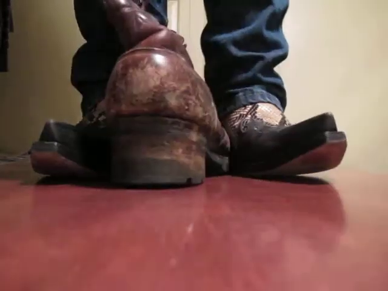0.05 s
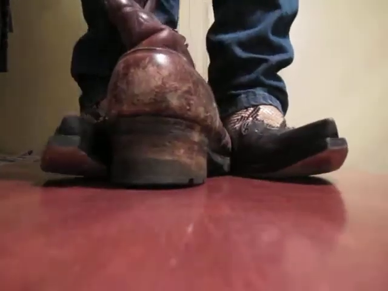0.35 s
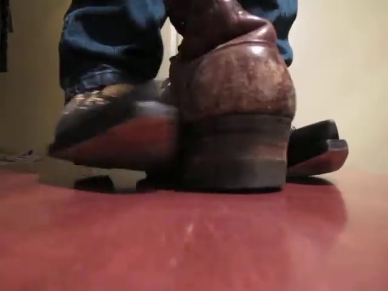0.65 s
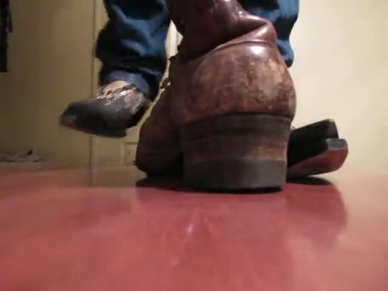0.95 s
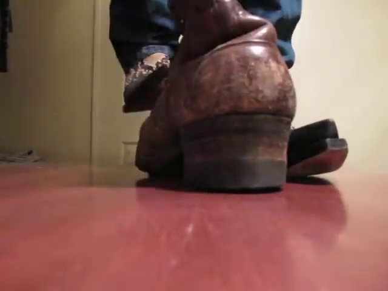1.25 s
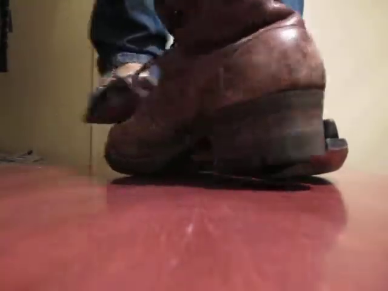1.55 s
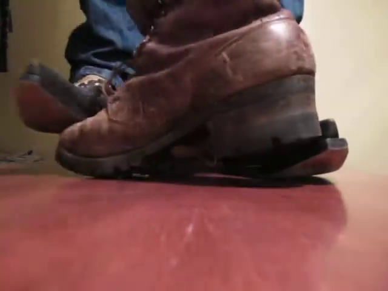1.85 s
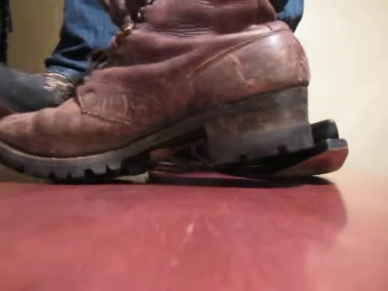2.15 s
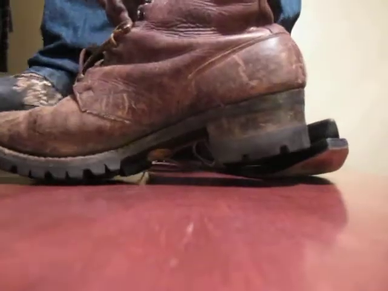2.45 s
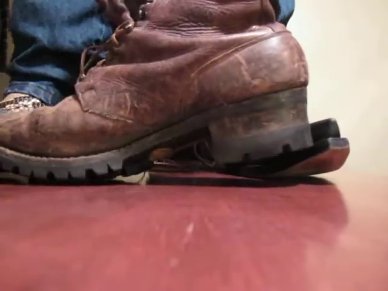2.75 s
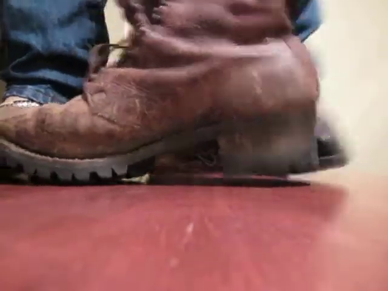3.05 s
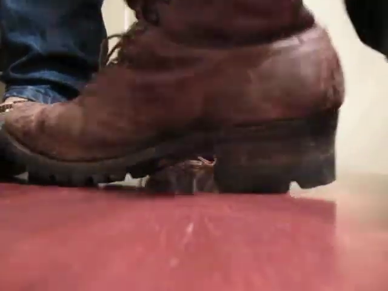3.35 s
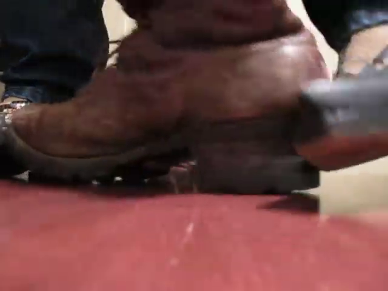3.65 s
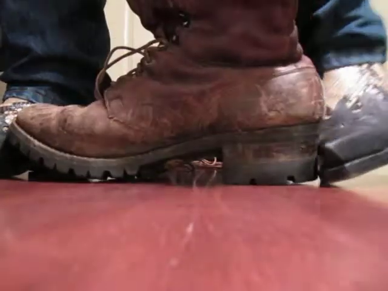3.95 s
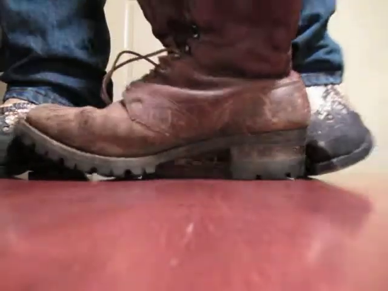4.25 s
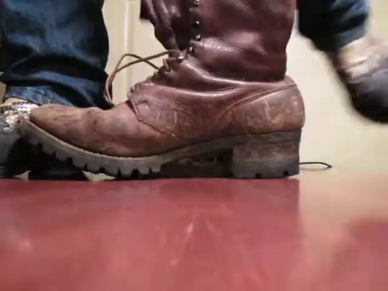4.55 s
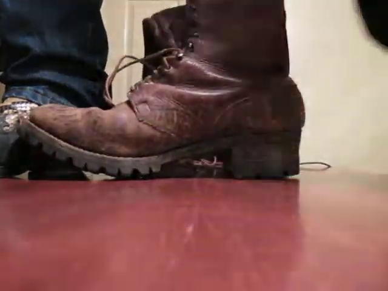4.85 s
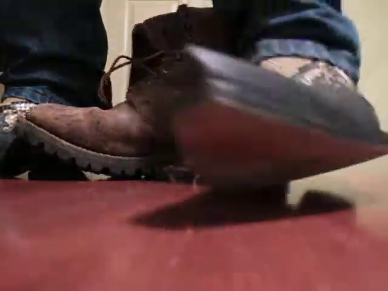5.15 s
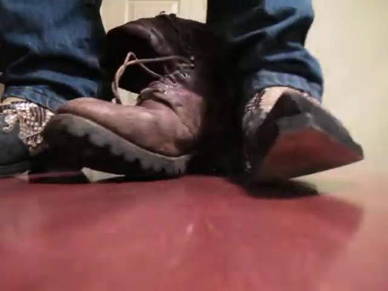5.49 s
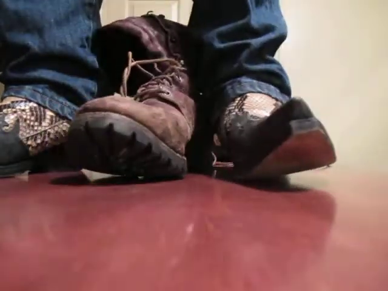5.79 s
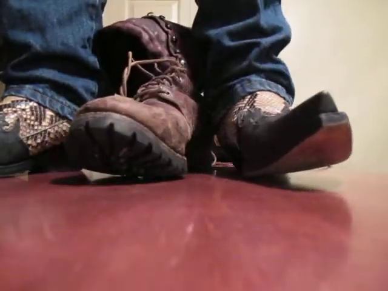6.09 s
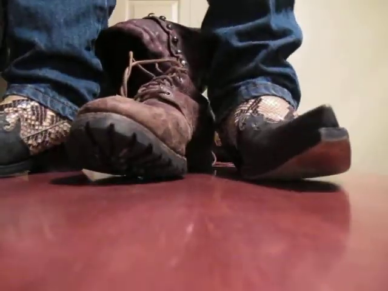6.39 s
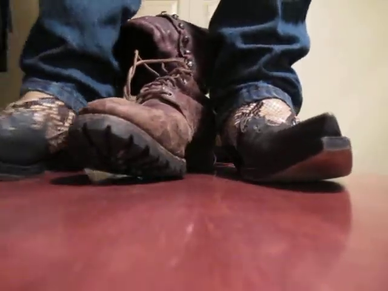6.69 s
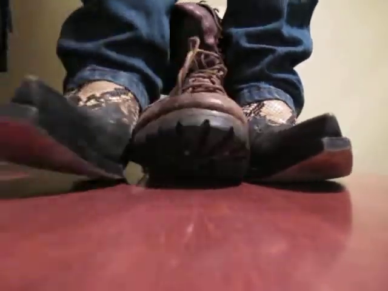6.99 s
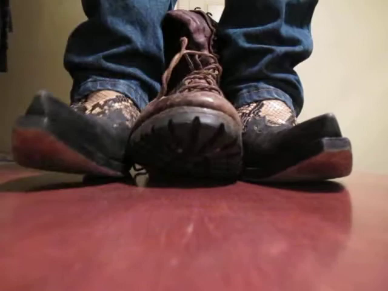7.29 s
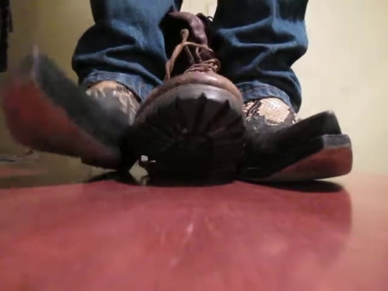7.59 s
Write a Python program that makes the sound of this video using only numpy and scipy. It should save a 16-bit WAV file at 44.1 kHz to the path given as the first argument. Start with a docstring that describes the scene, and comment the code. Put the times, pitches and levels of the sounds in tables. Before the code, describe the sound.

Boots stomp and grind against an empty leather boot on a wooden floor, with dull thuds, scuffs and small creaks.

```python
"""Heeled leather boots against an empty work boot on a wooden floor; small room, close low microphone.
Rumble and mains hum throughout. First, denim and leather rub, soles catch, leather sticks and squeaks.
From 0.35 s, stomps among light taps: each thuds in the sole, rings the boards, slaps the leather.
The hardest, at 3.07 s amid creaks, hits a limiter. From 4 s, mostly grinding, taps and soft blows.
From 6.7 s, a squeak and a last run of stomps."""
import sys
import numpy as np
from scipy import signal
from scipy.fft import rfft, irfft, next_fast_len
from scipy.io import wavfile
from scipy.ndimage import uniform_filter1d, minimum_filter1d

SR = 44100
rng = np.random.default_rng(int(sys.argv[2]) if len(sys.argv) > 2 else 0)


def put_to_file(sound):
    """Save the sound as 16-bit audio at rate SR, in the file named by the first command-line argument."""
    columns = np.atleast_2d(sound).T  # one column per channel
    safe = np.clip(columns, -1, 1)
    whole_steps = np.round(safe * 32767)
    wavfile.write(sys.argv[1], SR, whole_steps.astype(np.int16))


N = 345303
TIME_S = np.arange(N) / SR
AGE_S = np.arange(SR // 3) / SR  # since a blow
TOP_HZ = 15700

# spectra of building rumble, denim swish, sole scuff, leather slip, heel knock, leather slap:
# f/Hz, level/dB
RUMBLE_EQ = [(4, -5), (10, -2), (20, -8), (32, -24.5), (55, -25), (100, -30.5), (170, -39), (300, -45.5),
             (600, -56), (2000, -73.5)]
SWISH_EQ = [(700, -3), (2200, 3), (3700, -0.5), (5500, 1), (8000, 4.5), (9800, 3), (11000, -1.5),
            (12500, -10), (15500, -25)]
SCUFF_EQ = [(60, 1), (150, 11.5), (280, 15), (450, 8.5), (800, 4.5), (1400, 0), (1900, -4), (3000, -5),
            (6000, -9.5), (14000, -44)]
CREAK_EQ = [(300, -11), (900, 13), (1900, 8), (3200, 9), (5000, 7.5), (9000, 3), (12000, -13), (15500, -22)]
KNOCK_EQ = [(250, -15), (450, 1.5), (780, -1), (1200, -11), (1900, -11), (3000, -21), (6000, -36.5),
            (14000, -46)]
SLAP_EQ = [(700, -42.5), (1800, 3.5), (3200, 9.5), (5000, 3), (9500, 0), (12000, -14), (15500, -29)]
# boot sliding along boot: t/s, length/s, swish/dB, scuff re swish/dB, swell/dB
BOOT_SLIDES = [(0,0.019,-45.5,16,-19), (0.286,0.36,-52.5,5.5,-17), (0.583,0.034,-44,0,3),
               (1.642,.4,-54.5,-5,1), (2.055,0.17,-57.5,5,-8), (2.305,0.26,-64.5,11.5,-12),
               (2.62,0.4,-62.5,11,-8), (2.923,0.087,-41.5,-2.5,1.5), (3.234,0.3,-64.5,8.5,-13),
               (3.374,0.16,-56.5,7,10.5), (3.603,0.12,-61,5.5,12), (3.736,.11,-50,1,-9),
               (4.037,0.33,-52,0.5,-0.5), (4.7,0.19,-61.5,-16,1), (4.992,0.097,-52.5,7.5,-1),
               (5.244,.12,-60,3.5,-0.5), (5.373,0.32,-53.5,-1,-2), (6.403,0.12,-69,16,0.5),
               (6.763,0.16,-53.5,6.5,-5.5), (7.078,0.049,-44,4,5), (7.252,.17,-52,8.5,7.5),
               (7.499,0.22,-57.5,9,0.5)]
# hollows and folds of the uppers: f/Hz, width/Hz, level/dB
UPPER_RESONANCES = [(1760, 400, -15), (3760, 680, -6.5), (9370, 2200, -10)]
# drags ringing a sole or the hollow shaft: mid t/s, length/s, f/Hz, level/dB
SOLE_DRAGS = [(0.011, 0.021, 313, -40), (0.024, 0.037, 1020, -40.5), (0.483, 0.091, 2100, -54.5),
              (0.618, 0.049, 225, -41.5), (3.089, .05, 660, -26.5), (3.415, 0.0118, 594, -29),
              (4.116, 0.047, 870, -50.5), (4.27, 0.19, 1730, -59), (4.762, 0.074, 650, -52),
              (5, 0.049, 1010, -46), (5.045, 0.066, 263, -37.5), (5.342, 0.21, 1750, -56.5),
              (5.983, 0.072, 2020, -56), (6.27, .03, 585, -49), (7.39, 0.14, 597, -49)]
# leather stick-slip: t/s, length/s, first rate/Hz, last rate/Hz, peak/dB, unevenness/1
LEATHER_CREAKS = [(0.001, 0.03, 894, 1212, -24, 0.09), (0.027, 0.025, 900, 704, -25, 0.25),
                  (2.615, .016, 863, 597, -24.5, 0.32), (2.718, 0.0055, 300, 693, -27, 0.07),
                  (2.834, .025, 292, 159, -34, 0.52), (2.861, .022, 271.3, 328.5, -24.5, .2),
                  (3.25, .024, 790, 1167, -29, 0.05), (6.73, .03, 398.6, 299, -27, 0.2)]
# blows: t/s, thud peak/dB, thud f/Hz, joist boom/dB, heel knock/dB, leather slap/dB
BLOWS = [(0.349,-7,225,-23,-29.5,-55), (1.008,-21,157,-21.5,-32,-41), (1.303,-16,141,-24.5,-32.5,-38.5),
         (1.387,-26.5,237,-38,-52.5,-74), (1.52,-7,195,-17,-29.5,-34.5),
         (1.721,-22.5,190,-25.5,-42.5,-50.5), (2.149,-17.5,185,-23,-42.5,-68),
         (2.397,-26.5,180,-26.5,-52,-54), (2.657,-27,260,-26.5,-37,-47.5),
         (2.837,-26.5,254,-29.5,-44.5,-53), (3.071,4.5,259.5,-11.5,-10,-40.5),
         (3.413,-22.5,192,-23,-45,-45), (3.56,-14,186,-27.5,-43.5,-47.5), (3.762,-14,252,-21,-35.5,-59),
         (3.853,-27,229,-45,-47.5,-66), (3.943,-29,190,-33.5,-47,-50), (5.034,-20,170,-22.5,-41.5,-58),
         (5.761,-34,169,-37.5,-71,-69), (6.258,-24,255,-51,-58,-74), (6.777,-25.5,193,-32,-37.5,-50),
         (6.942,-19,163,-24.5,-37.5,-43), (7.102,-12.5,242,-29,-32.5,-53), (7.47,-24.5,166,-32,-45,-46)]
# modes of floorboards, joists, stacked heel with the panel under it: f/Hz, level/dB, t60/s
BOARD_MODES = [(155.7, -2, 0.25), (239.6, 4.5, 0.062), (247.4, -6, 0.26), (298, -13, 0.11),
               (326, -10.5, 0.14), (370, 2.5, 0.097), (489, -25, 0.17)]
JOIST_MODES = [(47.7, 1, 0.35), (57.56, 1.5, 0.39), (79.7, 0.5, 0.2), (98, 4, 0.12)]
HEEL_MODES = [(561.5, 10, 0.19), (753, 1, 0.076), (747, 1, 0.18), (840, -12, 0.13), (1105, 3, 0.027),
              (1318, 6, 0.04), (1840, -18, 0.023), (1980, -10, 0.074)]
# light contacts: t/s, knock/dB, snap/dB
LIGHT_TAPS = [(0.810,-39,-49.5), (0.956,-43,-48), (2.301,-49,-47), (2.687,-45,-55), (2.725,-45,-38),
              (3.970,-43.5,-49), (4.511,-41.5,-55), (5.393,-40.5,-48), (5.924,-45.5,-57), (5.955,-37,-44),
              (5.99,-46.5,-49.5), (6.464,-63,-51), (6.516,-37.5,-51), (6.721,-42.5,-44),
              (7.043,-40.5,-50.5), (7.246,-39,-60), (7.260,-37.5,-45.5), (7.593,-48,-51), (7.713,-52,-45),
              (7.741,-46.5,-48)]
# room decay: f/Hz, t60/s
ROOM_DECAY = [(100, 0.28), (500, 0.21), (2000, 0.17), (10000, 0.23)]


def undb(db):
    """Decibels to gain."""
    return 10 ** (np.asarray(db) / 20)


def on_log_axis(points, hz):
    """Interpolate (f/Hz, value) points over log frequency."""
    points_hz, values = np.transpose(points)
    return np.interp(np.log(np.maximum(hz, 1)), np.log(points_hz), values)


def colour(x, eq):
    """Minimum-phase filter from (f/Hz, level/dB) points."""
    size = 2 * next_fast_len(len(x))
    bins_hz = np.arange(size // 2 + 1) * SR / size
    cepstrum = irfft(np.log(undb(on_log_axis(eq, bins_hz))))
    cepstrum[1:size // 2] *= 2
    cepstrum[size // 2 + 1:] = 0
    return irfft(rfft(x, size) * np.exp(rfft(cepstrum)))[:len(x)]


def resonate(x, hz, width_hz):
    """One resonance, unity gain at centre."""
    return signal.lfilter(*signal.iirpeak(hz, hz / width_hz, fs=SR), x)


def unit(x):
    """Scale to rms 1."""
    return x / np.std(x)


def burst(x, db):
    """Set the rms level of the loudest 6 ms."""
    return x * undb(db) / np.sqrt(uniform_filter1d(x * x, 256, mode="constant").max())


def fade(t60_s):
    """Exponential decay, 60 dB in t60_s."""
    return np.exp(-np.log(1000) * AGE_S / t60_s)


def walk(rate_hz):
    """Smooth random drift, spread 1."""
    step = int(SR / rate_hz)
    stairs = np.repeat(rng.standard_normal(N // step + 1), step)
    return unit(uniform_filter1d(stairs, step)[:N])


def add(track, t_s, x):
    """Mix x in at t_s."""
    start = max(int(t_s * SR), 0)
    track[start:start + len(x)] += x[:N - start]


def background(rumble_db=-32, hum_hz=121.3, hum_db=-56):
    """Building rumble and wavering mains hum."""
    hum = np.sqrt(2) * np.sin(2 * np.pi * hum_hz * TIME_S) * undb(hum_db + walk(3.8))
    rumble = undb(rumble_db) * unit(colour(rng.standard_normal(N), RUMBLE_EQ))
    return rumble + hum


def stroke(start_s, length_s, swell_db, attack_s=0.019, release_tau_s=0.036):
    """Gain of one rub: sets in, swells or fades with pressure, dies away."""
    age_s = TIME_S - start_s
    ease_s = 0.25 * length_s * (swell_db > 0)
    attack = np.clip(age_s / (attack_s + ease_s), 0, 1)
    pressure = undb(swell_db * (np.clip(age_s / length_s, 0, 1) - 0.5))
    release = np.exp(-np.clip((age_s - length_s) / release_tau_s, 0, 20))
    return attack * pressure * release


def friction(eq, grain_db, grain_hz, judder_db):
    """Dense tiny catches of two surfaces under juddering pressure."""
    catches = rng.standard_normal(N) * undb(grain_db * walk(grain_hz) + judder_db * walk(45))
    return unit(colour(catches, eq))


def grit(rate_hz=22, peak_re_scuff_db=9.5, spread_db=4.5):
    """Sparse sharp catches of lugs and grains."""
    catches = rng.random(N) < rate_hz / SR
    strength = undb(spread_db * np.clip(rng.standard_normal(N), -2, 2))
    click_peak = np.abs(colour(signal.unit_impulse(SR), CREAK_EQ)).max()
    return undb(peak_re_scuff_db) * colour(catches * strength, CREAK_EQ) / click_peak


def rubbing(rest_swish_db=-62.5, rest_scuff_db=-57):
    """Denim and uppers swish, soles scuff lower and rougher; one stroke per slide or landing skid."""
    skid_s, skid_re_slap_db, skid_scuff_db, skid_swell_db = 0.091, -16.5, 11.5, -8.5
    skids = [(t_s, skid_s, slap_db + skid_re_slap_db, skid_scuff_db, skid_swell_db)
             for t_s, *_, slap_db in BLOWS]
    drift_db = -2.1 * walk(4)  # legs never quite still
    swish_power = undb(rest_swish_db + drift_db) ** 2
    scuff_power = undb(rest_scuff_db + drift_db) ** 2
    for t_s, length_s, swish_db, scuff_re_swish_db, swell_db in BOOT_SLIDES + skids:
        power = (undb(swish_db) * stroke(t_s, length_s, swell_db)) ** 2
        swish_power += power
        scuff_power += power * undb(scuff_re_swish_db) ** 2
    swish = friction(SWISH_EQ, grain_db=1, grain_hz=1500, judder_db=0.54)
    hollows = sum(undb(db) * resonate(swish, hz, width_hz) for hz, width_hz, db in UPPER_RESONANCES)
    scuff = friction(SCUFF_EQ, grain_db=1.5, grain_hz=492.5, judder_db=2) + grit()
    return unit(swish + hollows) * np.sqrt(swish_power) + scuff * np.sqrt(scuff_power)


def drag(length_s, hz, db, q=4):
    """Brief friction through one broad resonance."""
    swell = np.hanning(int(1.3 * length_s * SR))
    rasp = resonate(rng.standard_normal(SR), hz, hz / q)
    rasp = unit(resonate(rasp, hz, hz))
    return undb(db) * swell * rasp[:len(swell)]


def drags():
    """Soles catch on the floor and the hollow shaft."""
    out = np.zeros(N)
    for mid_s, length_s, hz, db in SOLE_DRAGS:
        rasp = drag(length_s, hz, db)
        add(out, mid_s - len(rasp) / SR / 2, rasp)
    return out


def creaks():
    """Leather stick-slip: slow uneven runs creak, fast even ones squeak."""
    out = np.zeros(N)
    for t_s, length_s, first_hz, last_hz, peak_db, uneven in LEATHER_CREAKS:
        size = int(length_s * SR)
        progress = np.linspace(0, 1, size)
        rate_hz = (first_hz + (last_hz - first_hz) * progress) * np.exp(uneven * walk(500)[:size])
        slips = np.diff(np.floor(np.cumsum(rate_hz) / SR), prepend=-1)
        scatter_db = (1.5 + 9 * uneven) * rng.standard_normal(len(AGE_S))[:size]
        force = slips * undb(scatter_db) * np.sqrt(1 - progress)
        creak = colour(np.pad(force, (0, SR // 20)), CREAK_EQ)
        add(out, t_s, creak * undb(peak_db) / np.abs(creak).max())
    return out


def ring(modes, scatter_db, detune):
    """Damped modes; foot position and load scatter level and pitch."""
    return sum(undb(db + scatter_db * rng.standard_normal()) * fade(t60_s)
               * np.sin(2 * np.pi * hz * (1 + detune * rng.standard_normal()) * AGE_S)
               for hz, db, t60_s in modes)


def contact(eq, db, touch_db, give_s, crush_t60_s, slide_db, slide_t60_s):
    """A touch, a short crush building as the leather gives, a fainter slide."""
    decay = fade(crush_t60_s) + undb(slide_db) * fade(slide_t60_s)
    force = rng.standard_normal(len(AGE_S)) * decay * (1 - fade(give_s))
    force[0] += undb(touch_db)
    return burst(colour(force, eq), db)


def knock(db, ring_re_strike_db=-9):
    """A hard edge lands and rings the heel."""
    strike = contact(KNOCK_EQ, db, touch_db=8, give_s=0.003,
                     crush_t60_s=0.016, slide_db=-22, slide_t60_s=0.06)
    return strike + burst(ring(HEEL_MODES, scatter_db=0, detune=0.006), db + ring_re_strike_db)


def thud(peak_db, hz, sole_t60_s=0.043, give_s=0.015, push_db=-7, boards_db=-15):
    """One push; the damped sole bounces and rings the boards, low-passed an octave above its pitch."""
    push = undb(push_db) * np.sin(np.pi * hz * AGE_S) * fade(t60_s=0.0092)
    bounce = np.sin(2 * np.pi * hz * AGE_S) * fade(sole_t60_s) * (1 - fade(give_s))
    sole = push + bounce
    lowpass = signal.butter(2, 2 * hz, fs=SR, output="sos")
    boards = signal.sosfilt(lowpass, ring(BOARD_MODES, scatter_db=3.5, detune=0.023))
    body = sole / np.abs(sole).max() + undb(boards_db) * boards
    return body * undb(peak_db) / np.abs(body).max()


def stomps(joist_rise_s=0.078, toe_lag_s=0.062, toe_re_thud_db=-20, drag_re_knock_db=-9):
    """Heel knocks and drags, leather slaps, sole thuds, joists swell; the forefoot lands later, softer."""
    out = np.zeros(N)
    for t_s, thud_db, hz, boom_db, knock_db, slap_db in BLOWS:
        joists = ring(JOIST_MODES, scatter_db=1, detune=0.046)
        boom = burst(joists * (1 - fade(joist_rise_s)), boom_db)
        slap = contact(SLAP_EQ, slap_db, touch_db=-3, give_s=0.008,
                       crush_t60_s=0.02, slide_db=-12, slide_t60_s=0.07)
        add(out, t_s, thud(thud_db, hz) + boom + knock(knock_db) + slap)
        add(out, t_s, drag(length_s=0.019, hz=610, db=knock_db + drag_re_knock_db))
        add(out, t_s + toe_lag_s, thud(thud_db + toe_re_thud_db, hz))
    return out


def taps():
    """Sole edges and lace hooks tick, too lightly to move the joists."""
    out = np.zeros(N)
    for t_s, knock_db, snap_db in LIGHT_TAPS:
        tock = contact(KNOCK_EQ, knock_db, touch_db=7, give_s=0.0016,
                       crush_t60_s=0.017, slide_db=-9, slide_t60_s=0.066)
        snap = contact(SLAP_EQ, snap_db, touch_db=-8, give_s=0.014,
                       crush_t60_s=0.01, slide_db=-43, slide_t60_s=0.042)
        add(out, t_s, tock + snap)
    return out


def room(x, wet_db=-14.5, build_s=0.028, dull_hz=800, dull_db_per_oct=-2):
    """Diffuse small-room reflections by octave; treble damped, bass rings longest."""
    tail = 0
    for hz in 2. ** np.arange(6, 15):
        edges_hz = [hz / np.sqrt(2), min(hz * np.sqrt(2), TOP_HZ)]
        bandpass = signal.butter(2, edges_hz, "band", fs=SR, output="sos")
        band = signal.sosfilt(bandpass, rng.standard_normal(len(AGE_S)))
        dull = undb(dull_db_per_oct * max(np.log2(hz / dull_hz), 0))
        tail += dull * band * fade(on_log_axis(ROOM_DECAY, hz))
    tail *= (1 - fade(build_s)) ** 2
    return x + undb(wet_db) * signal.fftconvolve(x, tail / np.linalg.norm(tail))[:N]


def scene():
    """Contacts through the room; rubbing and background direct. Mono."""
    contacts = stomps() + taps() + creaks() + drags()
    return (room(contacts) + rubbing() + background())[None]


def record(dry, ceiling_db=-3, release_tau_s=0.5):
    """A limiter catches the hardest stomp and ducks what follows; a steep low-pass cuts the top."""
    sink = TIME_S / release_tau_s
    log_level = np.log(np.abs(dry[0]) + 1e-9)
    peak = np.exp(np.maximum.accumulate(log_level + sink) - sink)  # instant rise, slow fall
    gain = 1 / np.maximum(peak / undb(ceiling_db), 1)
    gain = uniform_filter1d(minimum_filter1d(gain, size=65), size=65)
    lowpass = signal.ellip(10, 0.2, 80, TOP_HZ, fs=SR, output="sos")
    return signal.sosfilt(lowpass, dry * gain)


dry = scene()
out = record(dry)
put_to_file(out)
```